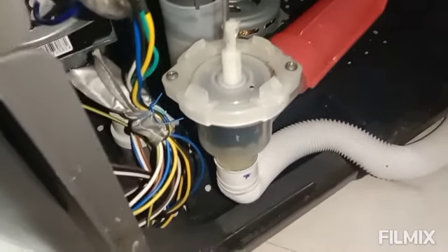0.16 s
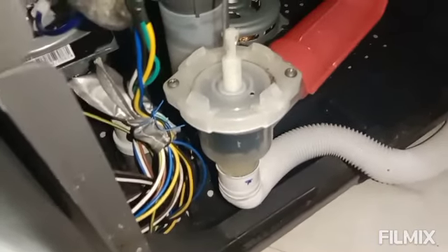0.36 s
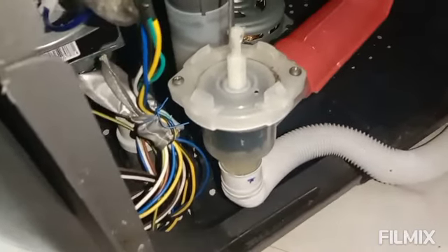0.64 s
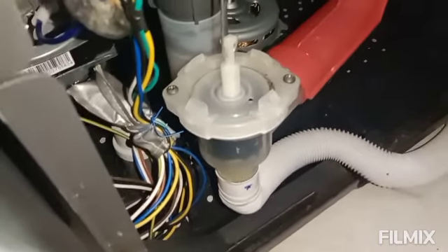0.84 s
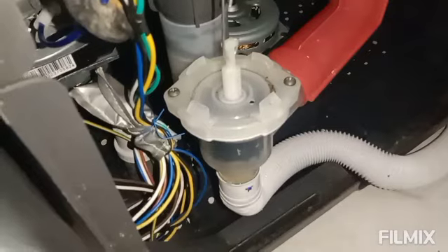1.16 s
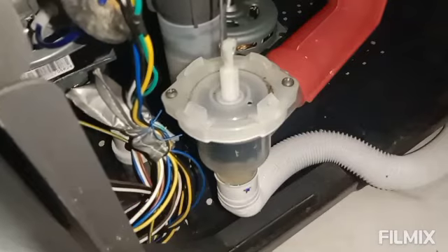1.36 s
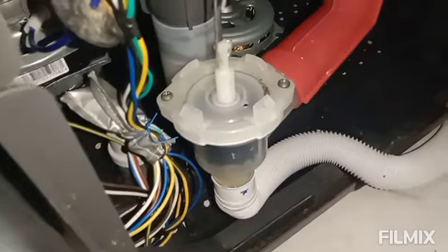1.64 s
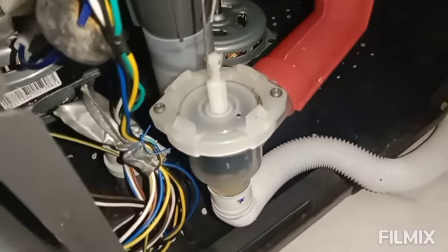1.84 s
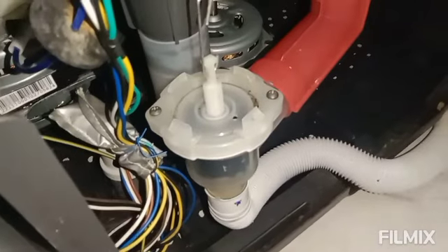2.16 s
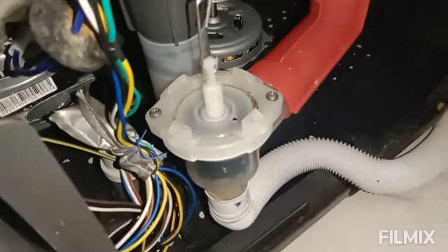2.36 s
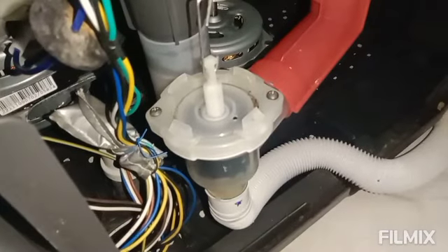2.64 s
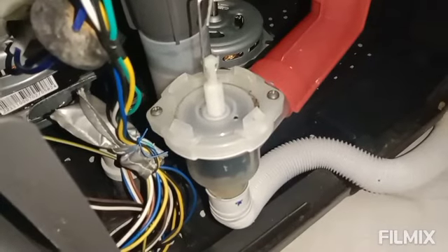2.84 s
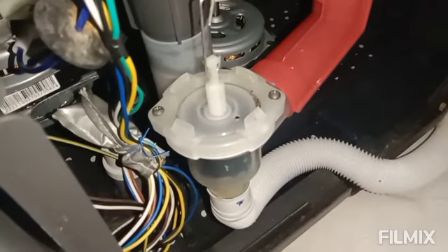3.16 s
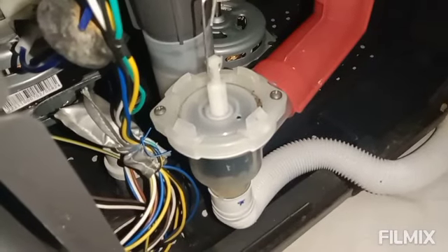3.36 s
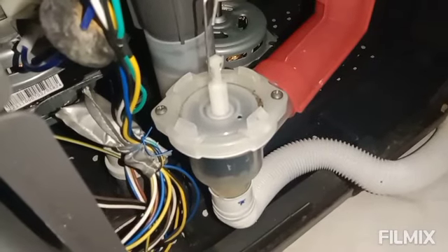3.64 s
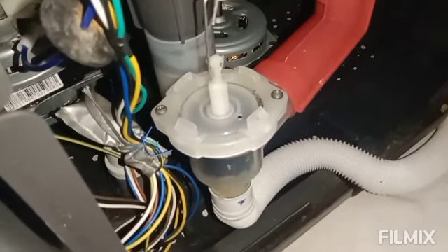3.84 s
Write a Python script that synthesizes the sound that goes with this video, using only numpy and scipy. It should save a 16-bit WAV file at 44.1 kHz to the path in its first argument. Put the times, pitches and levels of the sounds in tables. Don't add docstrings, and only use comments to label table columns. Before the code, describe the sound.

Steady electric drone with cabinet drumming and bright water splashes runs over half the clip, then stops suddenly; soft knocks, rushing water, drain glugs and a last drip fade into faint room rumble, heard close up.

```python
import sys
import numpy as np
from scipy import signal
from scipy.fft import rfft, irfft, next_fast_len
from scipy.io import wavfile
from scipy.ndimage import uniform_filter1d, map_coordinates

SR = 44100
rng = np.random.default_rng(int(sys.argv[2]) if len(sys.argv) > 2 else 0)


def makeup_ratio(level_db):
    decades = np.asarray(level_db, float) / 20
    return 10 ** decades


def digitize_waveform(pressure):
    field = np.atleast_2d(pressure).T
    bounded = np.clip(field, -1, 1)
    quanta = np.round(bounded * 32767).astype(np.int16)
    wavfile.write(sys.argv[1], SR, quanta)


N = 176400
T = np.arange(N) / SR

# f/Hz, level/dB per Hz
ROOM_SPECTRUM = [(15, -61.5), (50, -30), (110, -7), (419, -19), (900, -48), (1980, -120)]
HUM_ORDERS = [(1, -1), (1, 0), (1, 1), (2, -1), (1, 5), (2, 1), (3, -3), (3, -1), (3, 0), (4, -3), (4, 0),
              (5, -4), (5, -3), (6, -5), (2, -3), (2, -2), (3, 1), (4, 2), (6, -4), (6, 0), (7, 0), (14, 4)]
HUM_LEVELS = [-41.5, -25.5, -23, -24, -25, -19.5, -29.5, -40.5, -39, -42, -48, -46, -52, -41, -33, -34.5,
              -49, -48.5, -43, -48, -46, -48.5]
# f/Hz, level/dB per Hz
CABINET_SPECTRUM = [(30, -35.5), (100, 4), (150, 4.5), (187, 1), (215, 8), (255, -7.5), (430, -15),
                    (800, -100)]
PANEL_PITCHES = [448, 484, 506, 695, 839, 895, 1097, 1191, 1301, 1400, 1488, 1556, 1710]
# width/Hz, level/dB
PANEL_RINGS = [(26, -5.5), (17.3, 0.5), (18.54, -6), (44, -2.5), (18.4, -5.5), (31.7, -8), (16.7, -3),
               (27.778, -5.5), (26.4, 1), (93, -5.5), (38.5, 4.5), (25, -4), (52.4, -7)]
# f/Hz, level/dB per Hz
BUZZ_BED_SPECTRUM = [(150, -5), (260, -5), (689, 1.5), (950, -23.5), (1460, -5.5), (2200, -11), (2860, -65),
                     (4840, -120)]
# t/s, slosh level/dB, spray level/dB
WATER_FLOW = [(0, -39, -43.5), (.15, -40.5, -49.5), (.55, -41, -46.5), (.85, -39.5, -46.5),
              (.97, -40.5, -45), (1.3, -36.5, -39.5), (1.6, -33.5, -39.5), (1.77, -39, -44.5),
              (1.93, -39, -44.5), (2.22, -38.5, -42), (2.43, -38.5, -45.5), (2.5, -37, -41.5),
              (2.75, -37.5, -40), (3.1, -35, -40.5), (3.48, -40, -43), (3.57, -44, -48.5),
              (3.86, -41.5, -48), (4, -46, -48.5)]
# f/Hz, level/dB per Hz
SLOSH_SPECTRUM = [(900, -64.5), (1090, -9), (1250, -1), (1500, -5), (2600, -2.5), (4000, -3.5), (4450, -14),
                  (6500, -65.5)]
# f/Hz, level/dB per Hz
SPRAY_SPECTRUM = [(3500, -18), (4500, -8), (5200, -2), (6000, -5.5), (7300, -1.5), (8400, -5.5),
                  (9300, -21.5), (10500, -88)]
# f/Hz, level/dB per Hz
MIST_SPECTRUM = [(8300, -45), (9300, -10.5), (9700, -1), (11400, -7.5), (13000, -1), (14000, -7),
                 (15200, 0)]
# t/s, peak level/dB, mist level/dB, ring f/Hz
WALL_SLAPS = [(0.2104, -27.5, -62.5, 2430), (0.3346, -24.5, -48.5, 6830), (0.6074, -28, -55, 2680),
              (0.7035, -33, -70.5, 3870), (0.7862, -27, -46, 6600), (0.7974, -31.5, -62, 3040),
              (0.8735, -27, -58.5, 2550), (1.0064, -27.5, -60.5, 2570), (1.0524, -25.5, -52, 3010),
              (1.1024, -29, -51, 3220), (1.1548, -27.5, -47, 3990), (1.2655, -24.5, -50.5, 2620),
              (1.4634, -25, -58, 2840), (1.5512, -22.5, -52.5, 3750), (1.8133, -24.5, -59.5, 6570),
              (1.8784, -25, -52, 3580), (1.9874, -18, -51.5, 3760), (2.0592, -26.5, -52.5, 3260),
              (2.1226, -28.5, -52.5, 4100), (2.1997, -26, -57, 7300), (2.5531, -24.5, -54.5, 3150),
              (2.7914, -26, -48.5, 2490), (2.8892, -29, -49, 5560), (2.9475, -28, -56, 3600),
              (3.0324, -23.5, -47, 4330), (3.2576, -46, -52.5, 2960), (3.8484, -47, -69.5, 3120)]
# t/s, peak level/dB
DROPLETS = [(0.308, -52), (0.6679, -53.5), (0.7567, -52.5), (0.9183, -49.5), (1.1463, -39.5),
            (1.4057, -47.5), (1.6172, -44), (1.8294, -45.5), (1.8994, -37), (1.963, -39.5), (2.0812, -43.5),
            (2.2865, -45), (2.7013, -43)]
# t/s, length/s, level/dB rms, centre f/Hz, width/Hz
WATER_SHEETS = [(0.327, 0.014, -44, 6500, 1500), (0.819, 0.044, -38, 2900, 600),
                (1.069, 0.03, -39.5, 3100, 500), (1.188, 0.11, -36, 2380, 900),
                (1.283, 0.079, -32, 1740, 600), (2.192, 0.089, -40, 7150, 700),
                (2.151, 0.18, -39, 2000, 400), (2.49, .27, -45, 270, 60), (2.7, 0.034, -38.5, 1960, 250),
                (2.744, 0.073, -35.5, 2460, 905), (2.836, 0.23, -43.5, 1390, 200),
                (3.381, 0.093, -40.5, 3320, 700), (3.491, 0.036, -41, 2900, 300),
                (3.699, .17, -55, 1160, 90), (3.628, 0.067, -45.5, 2900, 700), (3.727, .09, -53, 1870, 200),
                (3.781, 0.069, -57.5, 910, 120), (3.825, 0.0094, -42, 3500, 700),
                (3.843, 0.021, -38.5, 2400, 895), (3.938, 0.016, -43, 2480, 800),
                (3.99, 0.022, -50.5, 1900, 495)]
# t/s, level/dB
COAST_SHAKE = [
    (2.42, -29.5),
    (2.68, -33.5),
    (2.72, -36.5),
    (2.97, -47.5),
    (3.05, -59),
    (3.18, -50.5),
    (3.33, -64),
]
# t/s, level/dB, f/Hz, T60/s
CABINET_THUMPS = [
    (2.421, -18, 70, 0.26),
    (2.505, -16, 113, 0.19),
    (2.547, -26, 68, 0.17),
    (2.58, -20, 105, 0.18),
    (2.63, -29, 76, 0.17),
    (2.713, -26, 126, 0.22),
    (2.845, -33, 95, 0.11),
    (3.626, -50, 120, .15),
]
# t/s, level/dB
DRAIN_FLOW = [
    (2.45, -38),
    (2.69, -38),
    (2.8, -35),
    (2.93, -40.5),
    (2.96, -34.5),
    (3.2, -42.5),
    (3.48, -51),
    (3.52, -65.5),
    (4, -76),
]
# t/s, level/dB, f/Hz, T60/s
AIR_POCKETS = [(2.699, -19, 343, 0.25), (2.753, -25, 353.6, 0.3), (2.785, -25, 579.5, 0.16),
               (2.825, -23, 590, 0.12), (2.955, -19, 625, 0.059), (3.072, -22.5, 640, 0.05),
               (3.36, -32.5, 658, 0.11), (3.43, -42.5, 680, 0.21), (3.481, -26, 1240, 0.08),
               (3.531, -39.5, 1220, 0.23), (3.659, -45.5, 1150, 0.48), (3.777, -5.5, 2640, 0.012),
               (3.6, -53, 500, 0.24), (3.86, -52.5, 684, 0.25)]

PULL_HZ, SHAFT_HZ = 100.01, 23.34
ON_S, RISE_S = 0.045, 0.026
OFF_S, CUT_S, CUT_T60 = 2.422, 2.482, 0.03
BURST_DB, SLAP_MIST_DB, SLAP_RING_DB, SLAP_S = -10.5, 3, -3, 0.021
GURGLE_HZ, GURGLE_CLIMB_HZ_PER_S = 595, 237


def unit(x):
    return x / np.sqrt(np.mean(x ** 2) + 1e-20)


def along(points, hz):
    f, v = np.transpose(points)
    return makeup_ratio(np.interp(np.log(hz + 1), np.log(f + 1), v))


def curves(rows):
    s, *cols = np.transpose(rows)
    return [np.interp(T, s, c) for c in cols]


def wobble(rate):
    knots = rng.standard_normal(4000)
    coarse_t = T[::16]
    return np.interp(T, coarse_t, map_coordinates(knots, [coarse_t * min(rate, 900)]))


def filtered(x, response):
    m = next_fast_len(N + SR // 2)
    return irfft(rfft(x, m) * response(np.fft.rfftfreq(m, 1 / SR)), m)[:N]


def rush(spectrum, patchy_db):
    z = signal.stft(rng.standard_normal(N), nperseg=512)[2]
    field = uniform_filter1d(rng.standard_normal(z.shape), size=8, axis=0)
    field = uniform_filter1d(field, size=8, axis=1)
    x = signal.istft(z * makeup_ratio(patchy_db * unit(field)), nperseg=512)[1][:N]
    return unit(filtered(x, lambda hz: along(spectrum, hz)))


def powered(t60, idle_db):
    rise = np.clip((T - ON_S) / RISE_S, 0, 1)
    decay_db = 60 * np.maximum(T - OFF_S, 0) / t60
    cut_db = 60 * np.maximum(T - CUT_S, 0) / CUT_T60
    return makeup_ratio(idle_db * (1 - rise) - decay_db - cut_db)


def bubbles(per_s, hz, spread, cycles, size_db, size):
    rows = rng.random((5000, 3))[:int(per_s * N / SR)]
    at = (rows[:, 0] * N).astype(int)
    pitch = hz[at] * np.exp(spread * (2 * rows[:, 1] - 1))
    turn = pitch[:, None] * np.arange(size) / SR
    wave = np.sin(2 * np.pi * turn * (1 + 0.11 * turn / cycles))
    wave = wave * np.exp(-3 * turn / cycles) * (1 - np.exp(-turn / 2)) ** 2
    loudness = makeup_ratio(np.minimum(-size_db * np.log(1 - rows[:, 2:]), 12))
    wave = wave * loudness * np.hanning(2 * size)[size:]
    slots = at[:, None] + np.arange(size)
    return unit(np.bincount(slots.ravel(), wave.ravel(), N)[:N])


def room():
    return makeup_ratio(-67 + 1.7 * wobble(12)) * rush(ROOM_SPECTRUM, patchy_db=1.5)


def drumming():
    shake = makeup_ratio(2.1 * wobble(19)) * rush(CABINET_SPECTRUM, patchy_db=-0.5)
    return makeup_ratio(-21.5) * shake * powered(t60=0.38, idle_db=-5.5)


def hum():
    lines = np.zeros(N)
    for (a, b), db in zip(HUM_ORDERS, HUM_LEVELS):
        hz = a * PULL_HZ + b * SHAFT_HZ
        level = makeup_ratio(db + 3 - 0.5 * wobble(8.88))
        lines += level * np.sin(2 * np.pi * (hz * T + rng.random()) + 0.26 * wobble(5.11))
    lines += makeup_ratio(-45 + 3 + wobble(6)) * np.sin(2 * np.pi * 57 * T + 0.3 * wobble(2))
    return lines * powered(t60=0.22, idle_db=-36)


def panel_response(f):
    total = 0
    for k, (c, (width, db)) in enumerate(zip(PANEL_PITCHES, PANEL_RINGS)):
        total = total + (-1) ** k * makeup_ratio(db) * 1j * f * width / (c * c - f * f + 1j * f * width)
    return total / (1 + 1j * f / 2500) ** 4


def loose_panels():
    sway = 0.51 * np.sin(2 * np.pi * SHAFT_HZ * T)
    gate = (0.5 + 0.5 * np.cos(2 * np.pi * PULL_HZ * T + sway)) ** 0.98
    gate = gate * (1 + 0.24 * np.cos(2 * np.pi * (PULL_HZ - SHAFT_HZ) * T))
    knocks = gate * makeup_ratio(-1.5 * wobble(80)) * rng.standard_normal(N)
    drift = np.cumsum(rng.standard_normal((len(PANEL_RINGS), N)), axis=1) * np.sqrt(np.pi / SR)
    singing = np.zeros(N)
    for c, (width, db), d in zip(PANEL_PITCHES, PANEL_RINGS, drift):
        level = makeup_ratio(db) * np.sqrt(width) / (1 + (c / 2500) ** 2) ** 2
        singing += level * np.sin(2 * np.pi * c * T + np.sqrt(width) * d)
    buzz = unit(filtered(knocks, panel_response))
    buzz = buzz + makeup_ratio(2) * unit(singing * (gate + 0.19))
    buzz = buzz + makeup_ratio(-1.5) * rush(BUZZ_BED_SPECTRUM, patchy_db=2.0)
    looser_db = 0.63 * (T - 1)
    return makeup_ratio(-33 + looser_db) * buzz * powered(t60=0.05, idle_db=-11.5)


def slosh(slosh_db, churn_db, burst):
    fizz = bubbles(990, np.full(N, 2500.), spread=0.445, cycles=21.3, size_db=2.0, size=400)
    body = rush(SLOSH_SPECTRUM, patchy_db=2.07) + makeup_ratio(-9) * fizz
    level = makeup_ratio(slosh_db + 0.75 * churn_db + 0.68 * wobble(17))
    return level * body + makeup_ratio(-4.5) * burst * rush(SLOSH_SPECTRUM, patchy_db=6.0)


def spray(spray_db, churn_db, burst):
    fine = bubbles(700, np.full(N, 6800.), spread=0.17, cycles=45, size_db=0.0, size=250)
    body = rush(SPRAY_SPECTRUM, patchy_db=2.0) + makeup_ratio(-6.0) * fine
    return makeup_ratio(spray_db + churn_db) * body + burst * rush(SPRAY_SPECTRUM, patchy_db=1.0)


def mist(spray_db, churn_db, puff):
    mean_db = spray_db.mean()
    mist_db = mean_db + 2.35 * (spray_db - mean_db + churn_db)
    level = makeup_ratio(-18.5 + mist_db + 2.5 * (T - 1.5))
    return (level + puff) * rush(MIST_SPECTRUM, patchy_db=1.2)


def slaps():
    burst, puff, ring = np.zeros((3, N))
    jitter = wobble(500)
    for s, db, fine_db, hz in WALL_SLAPS:
        u = np.maximum(T - s, 0)
        shape = (1 - np.exp(-u / 0.0012)) * np.exp(-u / SLAP_S)
        burst += makeup_ratio(db + BURST_DB) * shape
        puff += makeup_ratio(fine_db + SLAP_MIST_DB) * shape * np.exp(-u / 0.045)
        ring_shape = np.exp(-u / 0.0057) * (1 - np.exp(-u / 0.00085))
        ring += makeup_ratio(db + SLAP_RING_DB) * np.sin(2 * np.pi * hz * u + jitter) * ring_shape
    return burst, puff, ring


def tub():
    slosh_db, spray_db = curves(WATER_FLOW)
    churn_db = 0.36 * wobble(15) + 0.91 * wobble(28.04)
    burst, puff, ring = slaps()
    water = slosh(slosh_db, churn_db, burst) + spray(spray_db, churn_db, burst)
    return water + mist(spray_db, churn_db, puff) + ring


def flicks():
    shape = np.zeros(N)
    for s, db in DROPLETS:
        shape += makeup_ratio(db - 4.5) * (T > s) * np.exp(-np.maximum(T - s, 0) / 0.006)
    return shape * (rush(MIST_SPECTRUM, patchy_db=0.5) + makeup_ratio(6.5) * rush(SPRAY_SPECTRUM, patchy_db=2.5))


def sheets():
    out = np.zeros(N)
    size = 16384
    f = np.fft.rfftfreq(size, 1 / SR)
    for s, length, db, hz, width_hz in WATER_SHEETS:
        a, n = int(s * SR), int(length * SR * 1.3) + 64
        u = np.arange(n) / SR / length
        shape = np.clip(np.minimum(u, 1.3 - u) / 0.27, 0, 1)
        bell = np.exp(-0.5 * ((f - hz) / width_hz) ** 2)
        band = irfft(rfft(rng.standard_normal(size)) * bell)
        out[a:a + n] += (makeup_ratio(db) * shape * unit(band)[:n])[:N - a]
    return out


def settling():
    out = np.zeros(N)
    for s, db, hz, t60 in CABINET_THUMPS:
        u = np.maximum(T - s, 0)
        out += makeup_ratio(db - 60 * u / t60) * (1 - np.exp(-u / 0.006)) * np.sin(2 * np.pi * hz * u)
    return out


def coasting():
    low = filtered(rush(CABINET_SPECTRUM, patchy_db=0.5), lambda hz: 1 / (1 + (hz / 130) ** 2))
    level_db = curves(COAST_SHAKE)[0] + 2.3 * wobble(25.02) - 11 * np.maximum(T - 3.33, 0)
    return makeup_ratio(level_db) * unit(low) * np.clip((T - OFF_S) / 0.022, 0, 1)


def drain():
    level_db, = curves(DRAIN_FLOW)
    pitch = GURGLE_HZ + GURGLE_CLIMB_HZ_PER_S * np.maximum(T - OFF_S, 0)
    gurgle = bubbles(700, pitch, spread=0.478, cycles=11.8, size_db=1.0, size=900)
    gurgle = unit(filtered(gurgle, lambda hz: 1 / (1 + (400 / (hz + 1)) ** 6)))
    gurgle = gurgle * makeup_ratio(level_db - 2.5) * np.clip((T - OFF_S) / 0.047, 0, 1)
    for s, db, hz, t60 in AIR_POCKETS:
        u = np.maximum(T - s, 0)
        shape = makeup_ratio(db - 60 * u / t60 + 1.5 * wobble(64)) * (1 - np.exp(-u / 0.0058))
        rising = hz * u * (1 + 0.0546 * u / t60)
        gurgle = gurgle + shape * np.sin(2 * np.pi * rising + 0.58 * wobble(50))
    return gurgle


def scene():
    machine = drumming() + hum() + loose_panels() + settling() + coasting()
    water = tub() + flicks() + sheets() + drain()
    return (room() + machine + water)[None]


def roll_off(x):
    return signal.sosfilt(signal.butter(12, 15670, fs=SR, output="sos"), x)


def record(dry):
    bias = 0.004 * np.clip(4 * (2.15 - T), 0, 1)
    mix = filtered(dry[0] + bias, lambda hz: hz < 15500)[None]
    return roll_off(mix)


dry = scene()
out = record(dry)
digitize_waveform(out)
```